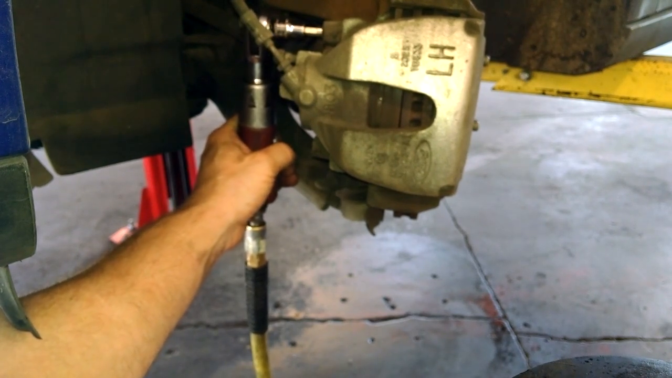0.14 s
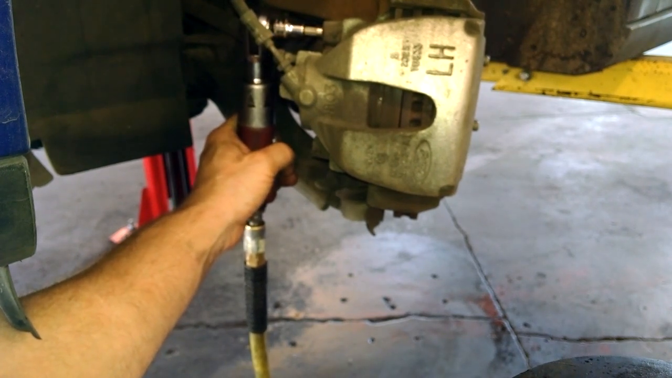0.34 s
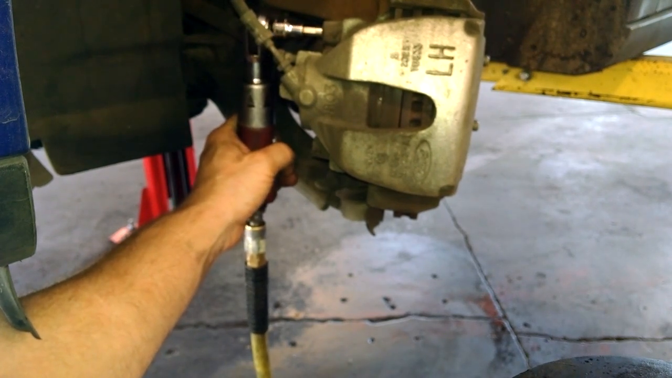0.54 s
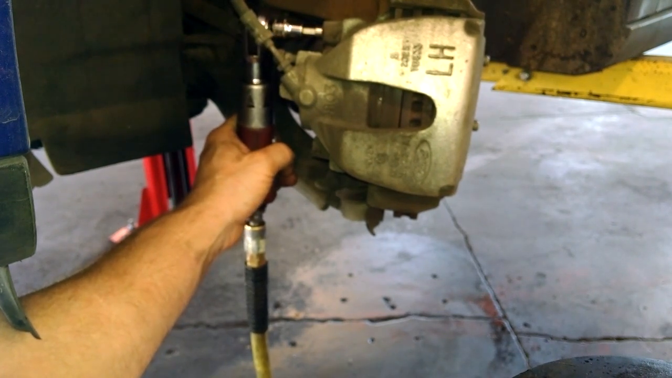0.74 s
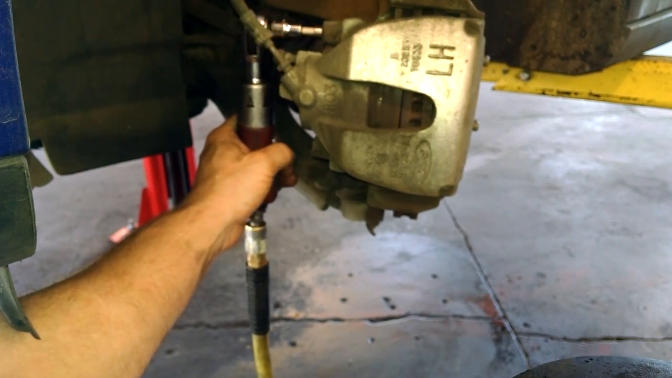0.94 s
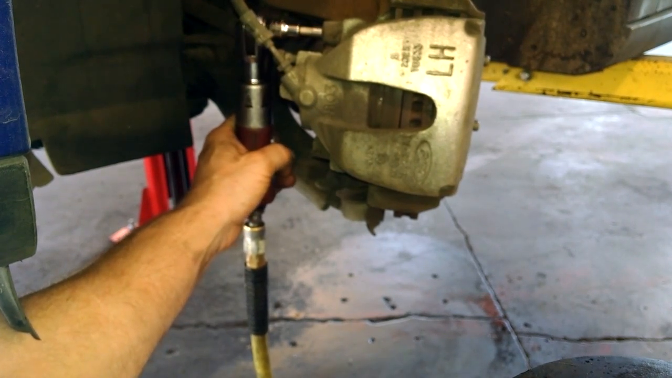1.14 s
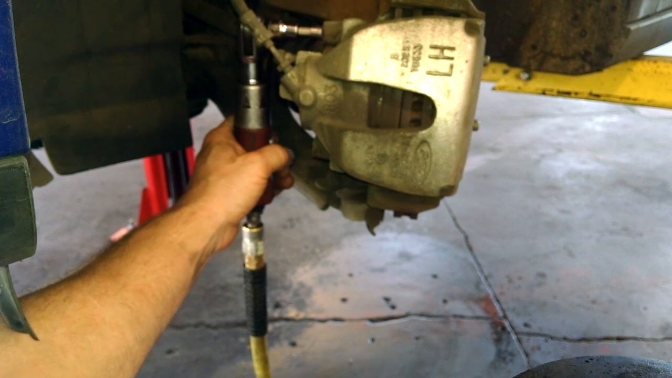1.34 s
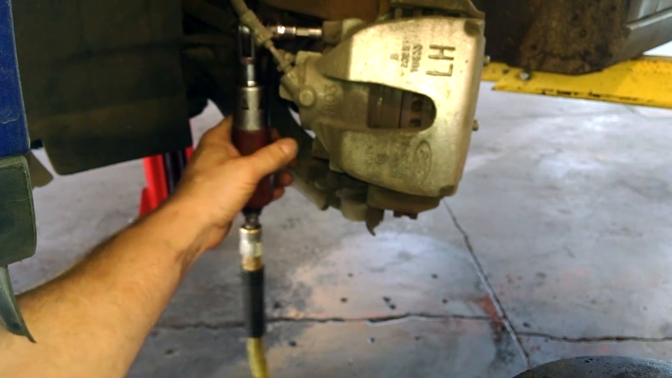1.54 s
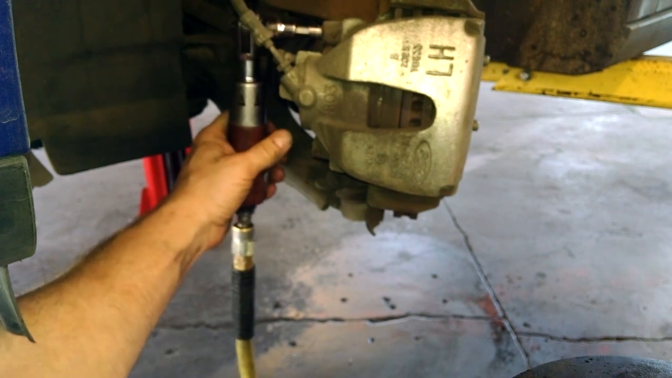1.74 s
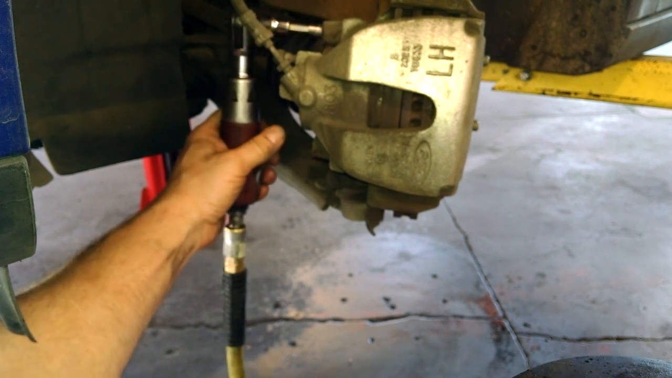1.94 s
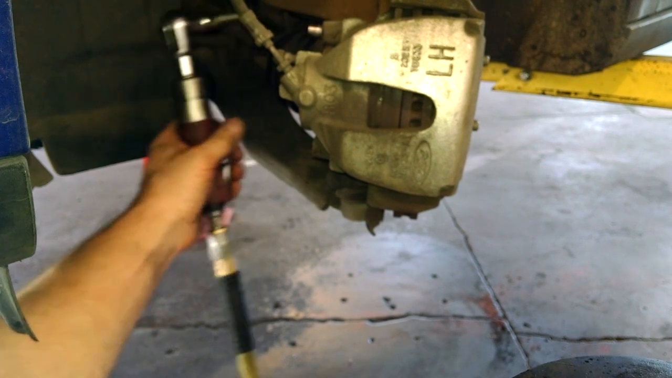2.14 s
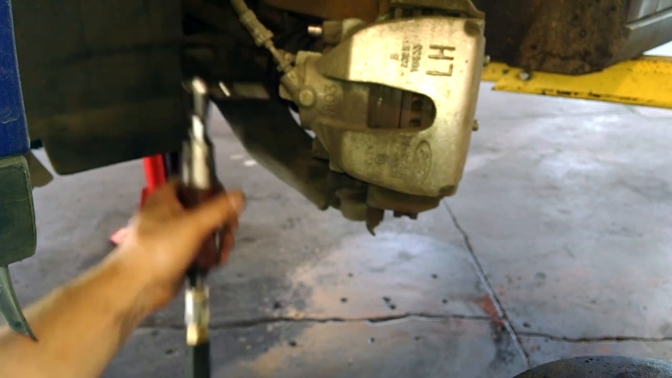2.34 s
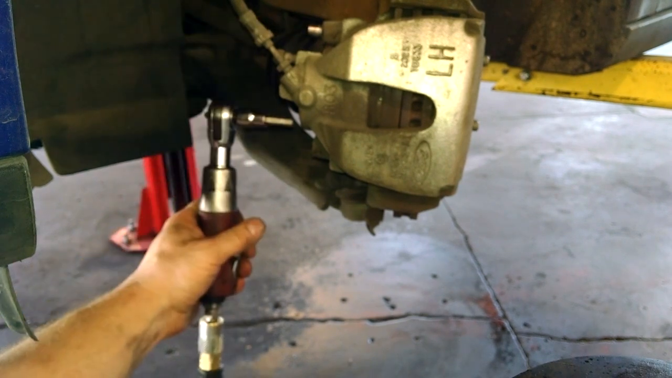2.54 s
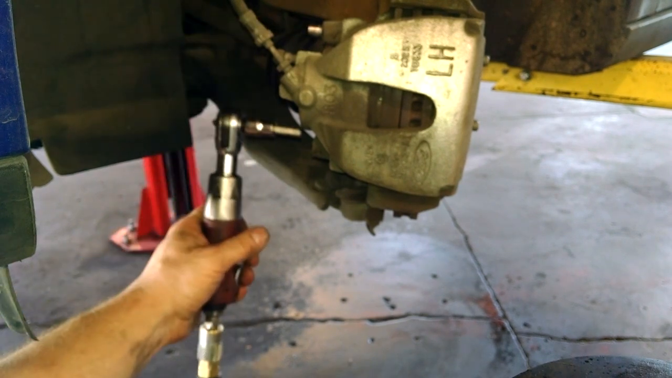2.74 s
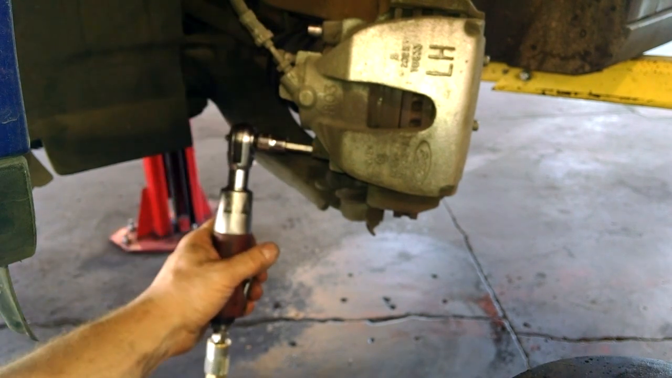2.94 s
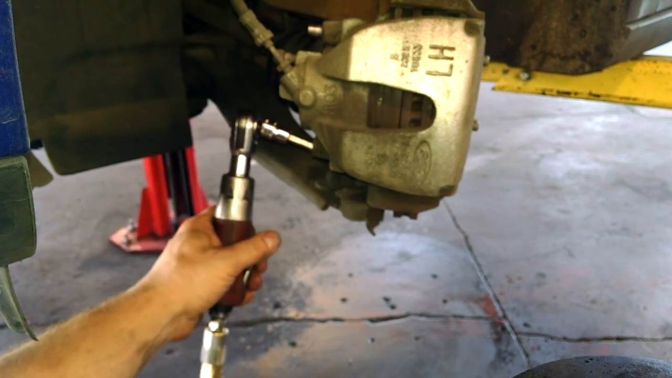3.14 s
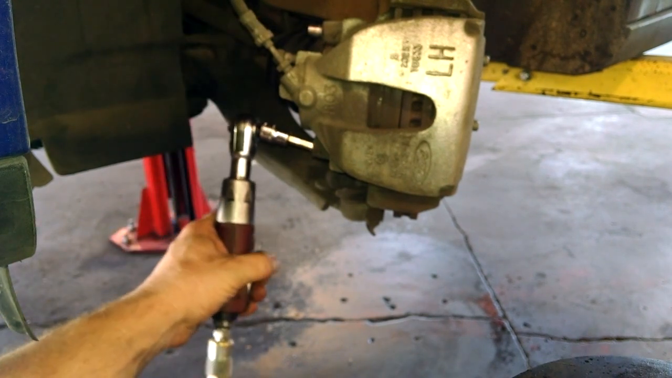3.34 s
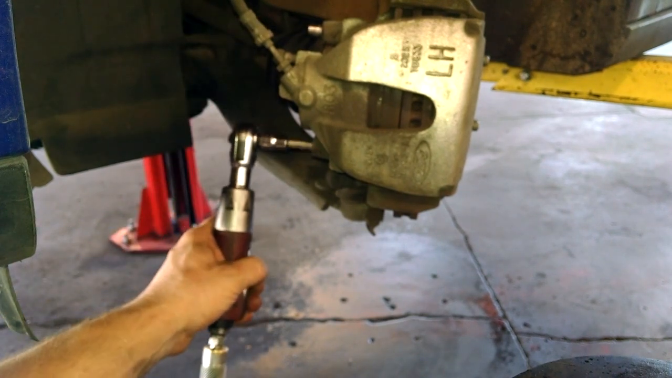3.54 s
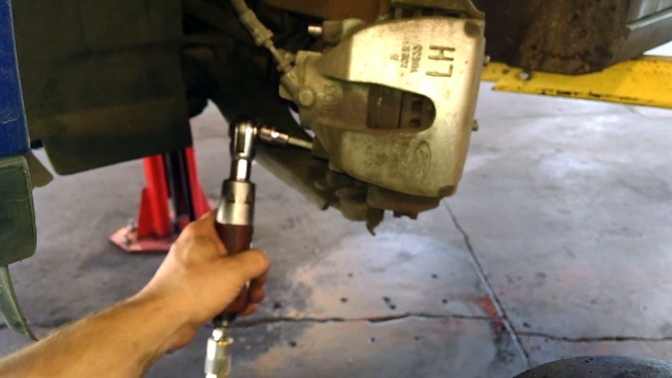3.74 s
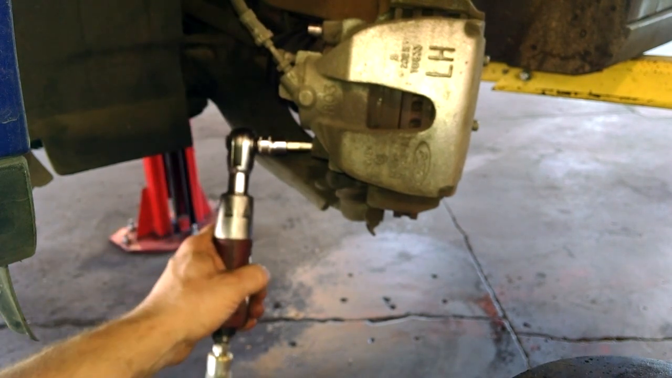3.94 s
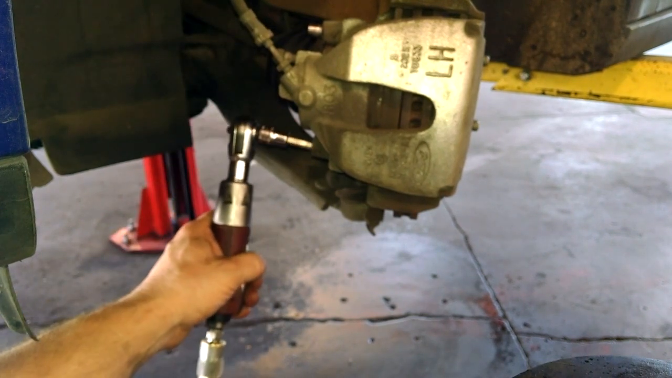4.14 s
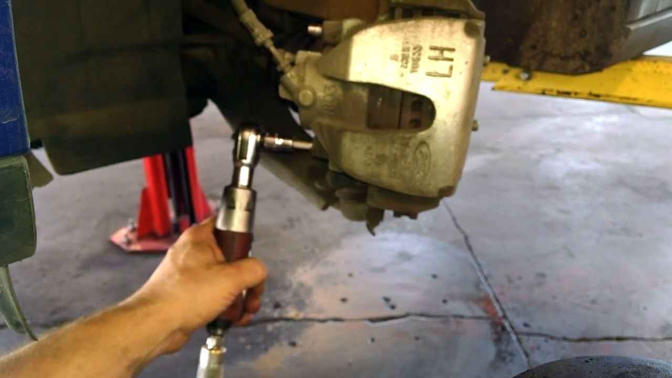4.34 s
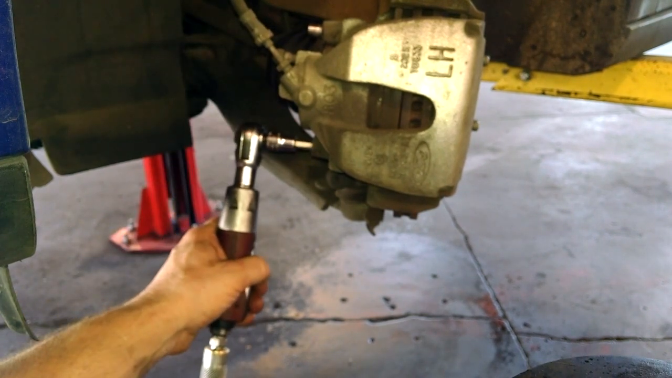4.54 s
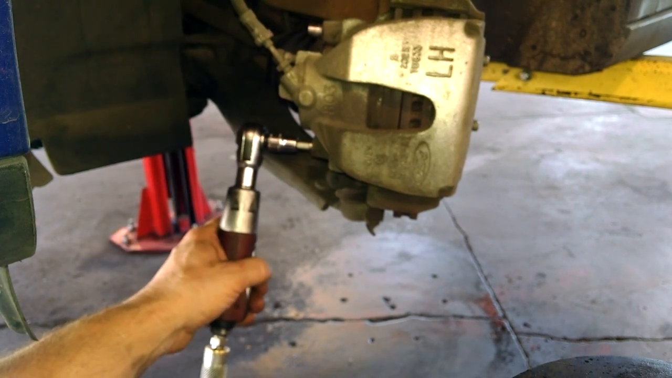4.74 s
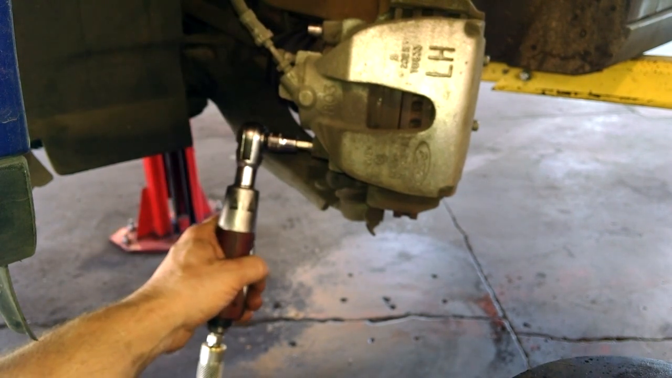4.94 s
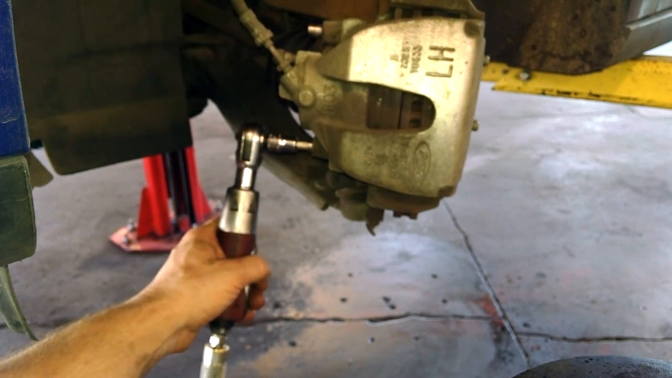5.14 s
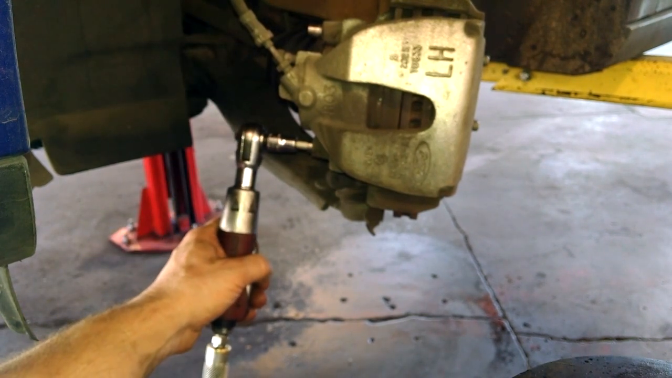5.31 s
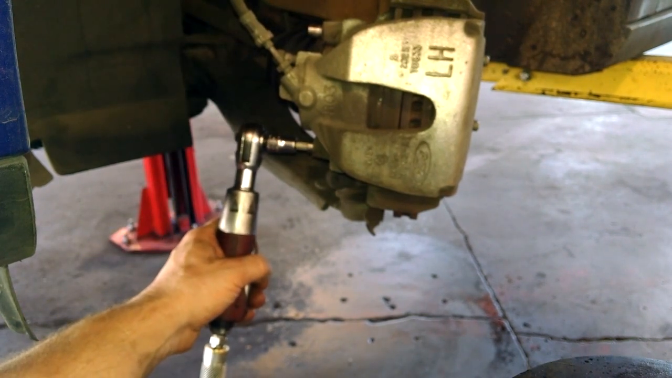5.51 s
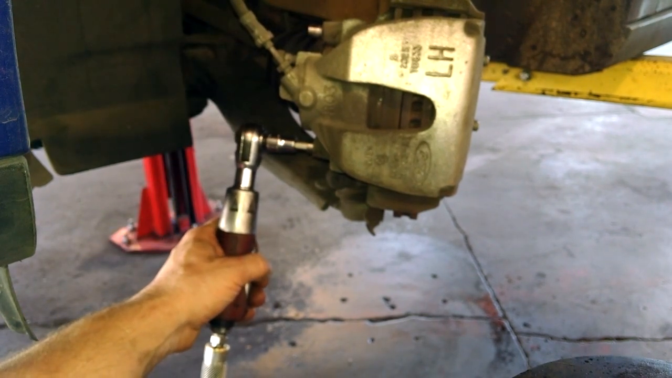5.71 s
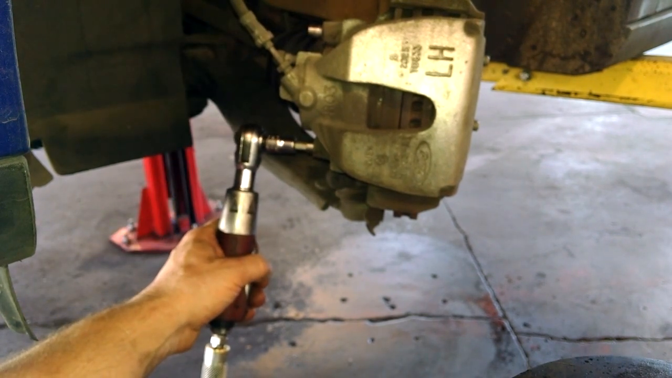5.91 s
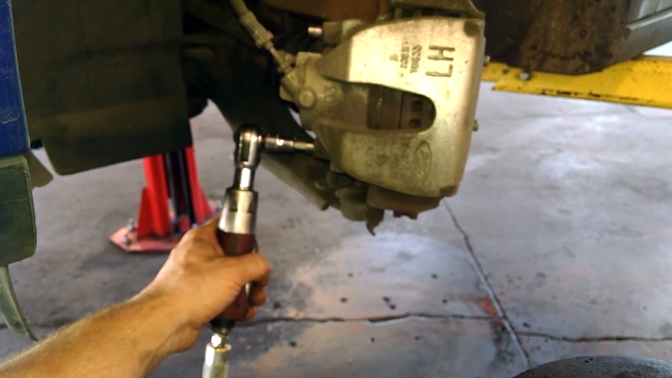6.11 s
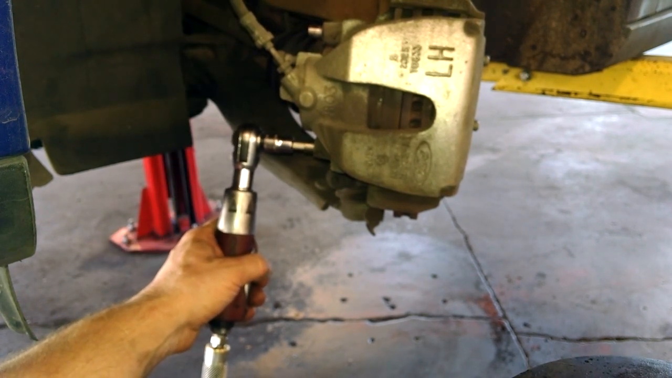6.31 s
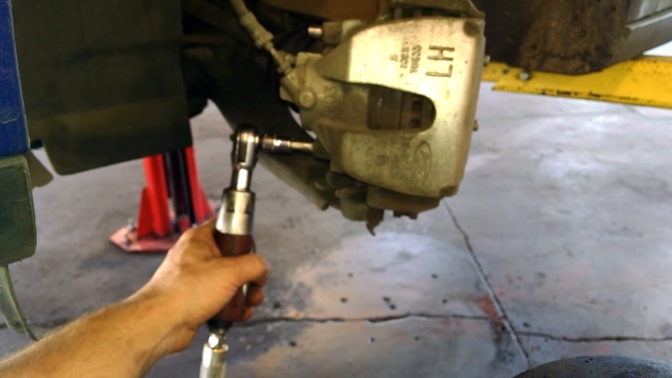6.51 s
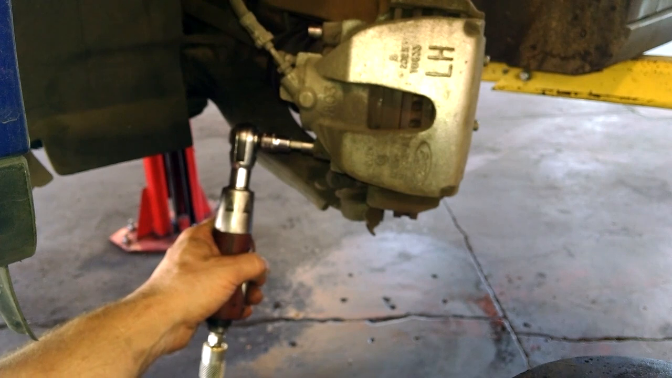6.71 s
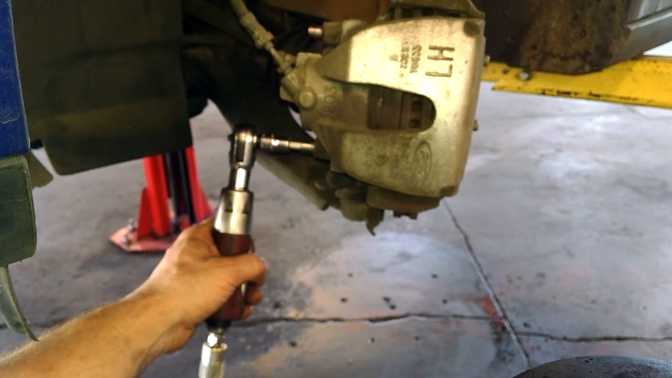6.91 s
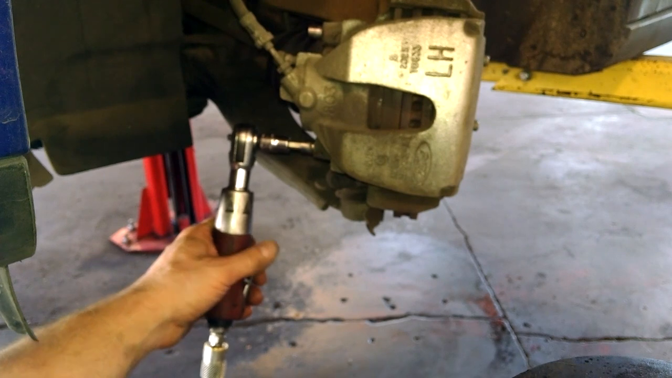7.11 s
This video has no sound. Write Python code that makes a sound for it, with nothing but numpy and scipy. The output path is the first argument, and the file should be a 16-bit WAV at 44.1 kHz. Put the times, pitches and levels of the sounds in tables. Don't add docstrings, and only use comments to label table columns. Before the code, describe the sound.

In a hard-walled garage, a hand-held air ratchet is already running close to the microphone, a bright rasping rush of exhaust with a high gear whine. It stops abruptly with a short spit of air, and the whine rings away. Room rumble and faint hiss swell up as the recording level rises. The socket scrapes and rings twice on a bolt, then the ratchet roars again, stopping with a few quick puffs just before the end.

```python
import sys
import numpy as np
from scipy import signal
from scipy.fft import rfft, irfft, next_fast_len
from scipy.io import wavfile
from scipy.ndimage import uniform_filter1d

SR = 44100
rng = np.random.default_rng(int(sys.argv[2]) if len(sys.argv) > 2 else 0)


def master_out(mix):
    frames = np.transpose(np.atleast_2d(mix))
    ceiling = np.clip(frames, -1, 1)
    pcm = np.round(ceiling * 32767).astype(np.int16)
    wavfile.write(sys.argv[1], SR, pcm)


def magnitude_from_level(level_db):
    exponent = np.asarray(level_db, float) / 20
    return 10 ** exponent


N = 320607
MESH_PER_TURN = 21.8

# trigger pulled t/s, released t/s, settled gear mesh f/Hz, exhaust level/dB, housing level/dB
BURSTS = [
    (-4.0, 1.618, 1533, -30.4, -43.3),
    (3.445, 7.162, 1531, -30.2, -44.3),
]
# left level/dB, right minus left level/dB, right lead/rad
WHINE = [
    [(-52, -4, .22), (-45.5, -.2, -.46)],
    [(-51, -6, -.4), (-39.5, -9, -2.45)],
]


def evened(x):
    return x / np.sqrt(np.mean(x ** 2) + 1e-20)


def read(points, hz):
    f, value = np.transpose(points)
    return np.interp(np.log(hz + 1), np.log(f + 1), value)


def coloured(spectrum, size):
    fast = next_fast_len(size)
    white = rfft(rng.standard_normal(fast))
    shaped = white * magnitude_from_level(read(spectrum, np.fft.rfftfreq(fast, 1 / SR)))
    return evened(irfft(shaped, fast)[:size])


def flutter(top_hz):
    return evened(signal.lfilter(*signal.butter(2, top_hz, fs=SR), rng.standard_normal(N)))


def controls():
    # t/s, share of full speed, gliding whine level/dB,
    # exhaust and housing level/dB against running
    spin_up = [
        (0, .13, -86, -50, -41),
        (.006, .22, -66, -12, -9),
        (.013, .35, -53.5, -9, -2),
        (.024, .62, -49.5, -1, -2),
        (.033, .92, -45, -2, 4),
        (.041, 1, -62, 1, 4),
    ]
    spin_down = [
        (.004, .93, -53, -3, -2),
        (.014, .62, -40.5, -10, 1.5),
        (.028, .36, -44.5, -20, -13),
        (.05, .22, -55, -26, -26),
        (.063, .19, -75, -42, -44),
    ]
    lag_db = [-10, -2, -.8, -1.5]
    # t/s, depth/dB
    binds = [(.23, 2.5), (.42, 3), (.7, 2.5), (1.08, 1.5), (1.55, 1.5), (3.6, 2.5), (3.8, 1), (4.22, 1.5),
             (4.7, 3), (4.87, 2), (5.18, 2), (5.69, 3.5), (6.02, 1.5), (6.33, 2), (6.64, 1.2), (6.97, 1.2)]
    bind_share = [.8, 1.2, 1.0, .7]
    settle_s, overtone_db = .055, -9.5
    lag_share, lag_s = .017, 2.2
    bind_s, bind_slows = .055, .0008

    knots, t, lag = [], np.arange(N) / SR, np.zeros(N)
    for (pull, release, hz, air, body), (first, second) in zip(BURSTS, WHINE):
        up, down = (
            [(at + s, share * hz, db, db + overtone_db, air + air_db, body + body_db)
             for s, share, db, air_db, body_db in move]
            for at, move in ((pull, spin_up), (release, spin_down)))
        steady = [(s, hz, first[0], second[0], air, body) for s in (pull + settle_s, release)]
        still = (.15 * hz, -120, -120, -120, -120)
        knots += [(pull - .005, *still)] + up + steady + down + [(release + .1, *still)]
        running = (t > pull + settle_s) & (t < release)
        lag += running * np.exp(-np.maximum(t - pull, 0) / lag_s)
    lag = uniform_filter1d(lag, size=441)
    sag_db = sum(db * np.exp(-((t - s) / bind_s) ** 2) for s, db in binds)
    s, *columns = np.transpose(knots)
    mesh_hz, *levels = (np.interp(t, s, c) for c in columns)
    held_hz = mesh_hz * (1 - lag_share * lag - bind_slows * sag_db)
    return [held_hz] + [db + lost * lag - share * sag_db
                        for db, lost, share in zip(levels, lag_db, bind_share)]


def ratchet():
    # f/Hz, level/dB
    exhaust = [(3000, -25), (5000, -10.5), (7000, -9), (8800, -7.2), (10300, -2), (12000, 4.5),
               (13000, 1.5), (14200, 7), (15300, 3), (16000, -1)]
    # f/Hz, level/dB
    housing = [(60, -44), (200, -31), (400, -16), (900, -19), (1800, -6.5), (2600, -1), (3150, 0),
               (3600, 1.5), (6000, -1.5), (9000, 0.5), (14000, -25.5)]
    throb_depths = [(1, .16), (2, .12), (3, .12), (5, .05)]
    # times per rotor turn, level/dB
    rotor_lines = [(3, -83), (6, -77), (8, -77), (28, -69)]
    mesh_fifths = [6, 11, 12, 13, 15, 19, 20, 25]
    fifths_db = [-72, -55, -57.5, -61.5, -52.5, -59.5, -55.5, -51]

    mesh_hz, first_db, second_db, exhaust_db, housing_db = controls()
    shaky_hz = mesh_hz * (1 + .0025 * flutter(71) + .0007 * flutter(9))
    turn = 2 * np.pi * np.cumsum(shaky_hz) / SR / MESH_PER_TURN
    speed = mesh_hz / mesh_hz.max()

    whine = np.zeros((2, N))
    burst = (np.arange(N) / SR > BURSTS[1][0] - 1).astype(int)
    for k, db in ((1, first_db), (2, second_db)):
        right_db, lead = np.array(WHINE)[burst, k - 1, 1:].T
        waver_db = 2.1 * speed ** 2 * flutter(45) + 1.1 * flutter(6.5)
        waver_db += (k * .8 + 1.2 * (1 - speed)) * flutter(130)
        level = np.sqrt(2) * magnitude_from_level(db + waver_db + [0 * db, right_db])
        whine += level * np.cos(k * MESH_PER_TURN * turn + [0 * db, lead + .4 * flutter(12)])

    weak = rotor_lines + [(k * MESH_PER_TURN / 5, db) for k, db in zip(mesh_fifths, fifths_db)]
    lines = sum(magnitude_from_level(db + exhaust_db + 31 + 3.9 * flutter(10)) * np.cos(order * turn) for order, db in weak)

    throb = 1 + sum(depth * np.cos(order * turn + order ** 2) for order, depth in throb_depths)
    gusts = evened(throb * magnitude_from_level(0.82 * flutter(700) + .6 * flutter(40)))
    air = []
    for path in range(2):
        jet = magnitude_from_level(exhaust_db + 6.0) * gusts * coloured(exhaust, N)
        air.append(jet + magnitude_from_level(housing_db + 7.5) * coloured(housing, N))
    return air + lines, whine


def rumble():
    # f/Hz, level/dB
    spectrum = [(20, -11.5), (60, 0.7), (170, -4), (400, -7.5), (700, -14), (1300, -18.5), (2200, -38.5),
                (4000, -62)]
    # t/s, level/dB
    swell = [(0, -6), (1.3, -6), (1.7, .5), (2.7, -1.5), (3.1, 1), (3.44, 1.5), (3.55, -14), (5.8, -10),
             (7.27, 7)]
    swell_db = np.interp(np.arange(N) / SR, *np.transpose(swell)) + 1.8 * flutter(15)
    return [magnitude_from_level(-79.5 + swell_db) * coloured(spectrum, N) for path in range(2)]


def hiss():
    # f/Hz, level/dB
    spectrum = [(1000, -1), (3000, -3), (7000, -4.5), (11000, -6), (15000, -6.5)]
    return [magnitude_from_level(-89) * coloured(spectrum, N) for path in range(2)]


def garage(x):
    # f/Hz, t60/s
    decay = [(300, 0.73), (1500, 0.79), (3000, 0.68), (4500, 0.44), (7000, .45), (14000, 0.25)]
    taps = np.zeros((2, 2 * SR))
    grid = np.arange(400, 2 * SR - 20, 20)
    at = grid + rng.integers(0, 20, (2, len(grid)))
    np.put_along_axis(taps, at, rng.choice([-1., 1.], at.shape), 1)
    hz, t, z = signal.stft(taps, SR, nperseg=256)
    fall_db = -60 * t / read(decay, hz)[:, None]
    z = z * (magnitude_from_level(fall_db) + magnitude_from_level(-14.5 + 0.41 * fall_db))
    tail = signal.istft(z, SR, nperseg=256)[1]
    return signal.fftconvolve(x, tail / np.linalg.norm(tail[0]), axes=1)[:, :N]


def linger():
    start_db = [-72, -67]
    t60 = 1.45
    out = np.zeros((2, N))
    for pull, release, hz, air, body in BURSTS:
        t = np.maximum(np.arange(N) / SR - release, 0)
        for k, db in zip((1, 2), start_db):
            level = np.sqrt(2) * (t > 0) * magnitude_from_level(db - 60 * t / t60 + 2.2 * flutter(14))
            out += level * np.sin(2 * np.pi * (.997 * k * hz * t + [[0], [.1]]))
    return out


def puffs():
    # t/s, peak level/dB, length/s
    spits = [
        (1.67, -26.5, .0035),
        (1.72, -51, 0.0021),
        (7.187, -37, 0.0028),
        (7.1945, -32, .002),
        (7.2055, -28, 0.004),
        (7.218, -51, .004),
    ]
    whistle_hz, width_hz = 12000, 650
    t, shape = np.arange(N) / SR, np.zeros(N)
    for s, db, length in spits:
        u = np.maximum(t - s, 0) / length
        shape += magnitude_from_level(db) * np.minimum(u * 3.0, 1) * np.exp(-u)
    edges = [whistle_hz - width_hz / 2, whistle_hz + width_hz / 2]
    noise = rng.standard_normal((2, N))
    whistle = evened(signal.lfilter(*signal.butter(1, edges, "band", fs=SR), noise))
    return shape * (whistle + .3 * noise)


def socket():
    # t/s, level/dB, rise/s, scrape t60/s
    seats = [
        (2.979, -49, 0.0048, 0.1),
        (3.183, -51.5, .010, 0.12),
    ]
    # f/Hz, t60/s, level/dB in first seating, level/dB in second
    modes = [(1803, 0.28, -17, -20), (1953, 0.33, -12, -11), (2030, 0.38, -17, -8), (2730, 0.12, -8, -18),
             (3640, 0.3, -14, -10), (3905, .15, -15, -17), (4320, .12, 0, -7), (4650, 0.07, 4, -12),
             (5405, .06, -10, -14), (6140, 0.041, 8, -7), (6600, 0.2, -13, -8), (8920, 0.049, -9, -9),
             (10900, 0.063, -14, 9), (14300, 0.044, -9, 0.5)]
    # f/Hz, level/dB
    scrape = [(700, -15.5), (1500, -9), (4500, 0), (7500, -7), (10000, -3.5), (12500, -14), (15000, -10)]
    out, t = np.zeros((2, N)), np.arange(SR // 2) / SR
    hz, ring_t60, *mode_db = np.array(modes).T[:, :, None]
    for (s, db, rise, t60), strength_db in zip(seats, mode_db):
        swelling = np.minimum(t / rise, 1)
        stroke = swelling ** .6 * magnitude_from_level(-60 * np.maximum(t - rise, 0) / t60)
        for path in out:
            roughness = evened(uniform_filter1d(rng.standard_normal(len(t)), 30))
            grit = stroke * coloured(scrape, len(t)) * magnitude_from_level(1.9 * roughness)
            wave = np.sin(2 * np.pi * (hz * t + rng.random(hz.shape)))
            ring = magnitude_from_level(strength_db - 60 * t / ring_t60) * wave
            path[round(s * SR):][:len(t)] += magnitude_from_level(db) * (grit + .5 * swelling * ring.sum(0))
    return out


def ports(near, other):
    # f/Hz, share
    likeness = [(100, 0.46), (400, 0.45), (800, .7), (1250, 0.96), (2000, .75), (2600, .92), (3800, .95),
                (5200, 0.94), (6400, 0.39), (7800, .88), (9000, .5), (10300, 0.73), (14000, .92),
                (15400, .75)]
    # f/Hz, level/dB
    left_db = [(100, -2), (500, 2.5), (3000, 0), (6000, -0.1), (12000, -1.5)]
    start_hz, comb_hz = 1290, 2540
    flip_hz = 171
    fast = next_fast_len(N)
    hz = np.fft.rfftfreq(fast, 1 / SR)
    same, tilt = np.clip(read(likeness, hz), 0, 1), magnitude_from_level(read(left_db, hz) / 2)
    early = 2j * np.pi * np.maximum(hz - start_hz, 0) / comb_hz
    lead = np.exp(early - 1j * np.pi * np.exp(-hz / flip_hz))
    near, other = rfft([near, other], fast)
    right = lead * same * near + np.sqrt(1 - same ** 2) * other
    return irfft([near * tilt, right / tilt], fast)[:, :N]


def scene():
    (air, whine), steel = ratchet(), socket()
    tool = air + puffs()
    echoes = garage(magnitude_from_level(-14.5) * tool + magnitude_from_level(-16) * whine + magnitude_from_level(-14) * steel)
    return ports(*(tool + steel + echoes + rumble() + hiss())) + whine + linger()


def drop_masked(x):
    band_bins = [40, 48, 56, 64, 72, 80, 88, 96, 108, 120, 132, 144, 160, 176, 196, 216, 240, 264, 292, 320,
                 352, 384, 416]
    # f/Hz, mid level/dB, side level/dB
    gaps = [(1000, 8.5, 8), (2180, 6, 13.5), (2400, 6.3, 13), (2703, 8, 12), (2975, 20, 20), (3260, 12, 6),
            (3600, 6.5, 1), (4252, 8, 8.5), (4920, 8.5, 9), (5460, 4, 7.5), (6400, 8.5, 13), (7370, 4, 14),
            (7900, 3, 14), (8770, 6, 14)]
    # t/s, level/dB
    spare = [(0, .3), (1.65, .3), (1.8, 7), (3.47, 5), (3.49, -1.5), (7.27, -1.5)]
    jitter_db, mask_db = 2.5, 11.5
    frame = dict(window="cosine", nperseg=2048, noverlap=1024)
    lead = 298
    mid_side = np.array([x[0] + x[1], x[0] - x[1]]) / 2
    t, z = signal.stft(np.pad(mid_side, ((0, 0), (lead, 0))), SR, **frame)[1:]
    spare_db = np.interp(t, *np.transpose(spare))
    under_db = mask_db + 3.0 * np.maximum(spare_db - 0.5, 0)
    whole = z.copy()
    hz, *gaps_db = np.transpose(gaps)
    for lo, hi in zip(band_bins, band_bins[1:]):
        power = abs(z[:, lo:hi]) ** 2
        loudest = (abs(whole[:, lo - 5:hi]) ** 2).max(1, keepdims=True)
        band = uniform_filter1d(power.mean(1), size=3)
        gap_db = np.array([[np.interp((lo + hi) * SR / 4096, hz, g)] for g in gaps_db])
        jitter = evened(uniform_filter1d(rng.standard_normal(len(t)), size=2))
        gap_db = gap_db + spare_db * (lo >= 160) + jitter_db * jitter
        band_stays = band > band[::-1] * magnitude_from_level(-2 * gap_db)
        bin_stays = power > loudest * magnitude_from_level(-2 * (under_db + 6.0 * (lo < 96)))
        z[:, lo:hi] *= band_stays[:, None] * bin_stays
    mid, side = signal.istft(z, **frame)[1][:, lead:lead + N]
    return np.array([mid + side, mid - side])


def band_limit(x):
    return signal.sosfilt(signal.butter(12, 16270, fs=SR, output="sos"), x)


def record(dry):
    # t/s, level/dB
    gain = [
        (0, 0),
        (1.7, 0.1),
        (2.0, 7),
        (2.4, 13),
        (3.439, 20),
        (3.469, 0.1),
        (7.27, 0),
    ]
    lifted = dry * magnitude_from_level(np.interp(np.arange(N) / SR, *np.transpose(gain)))
    low_pass = signal.firwin(1023, 15520, window=("kaiser", 9), fs=SR)
    limited = signal.oaconvolve(lifted, low_pass[None], "same")
    return band_limit(drop_masked(limited))


dry = scene()
out = record(dry)
master_out(out)
```